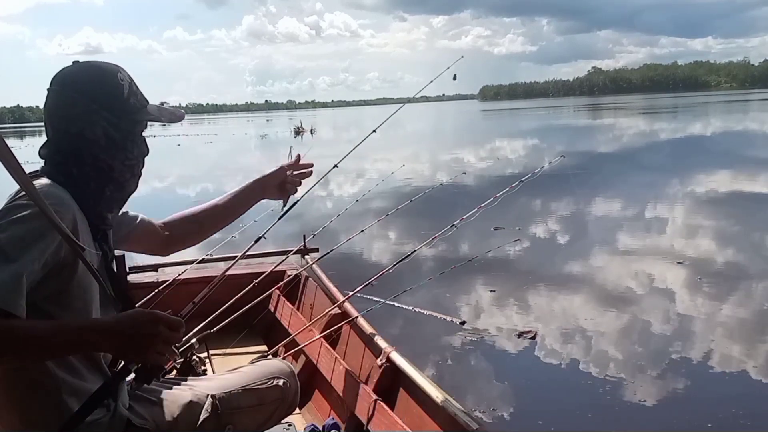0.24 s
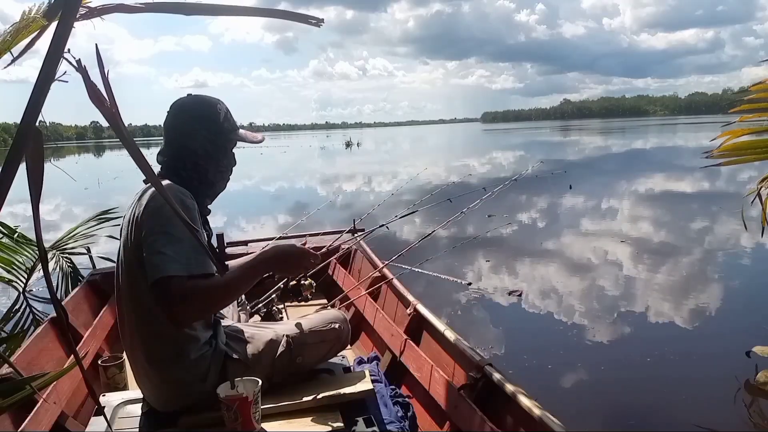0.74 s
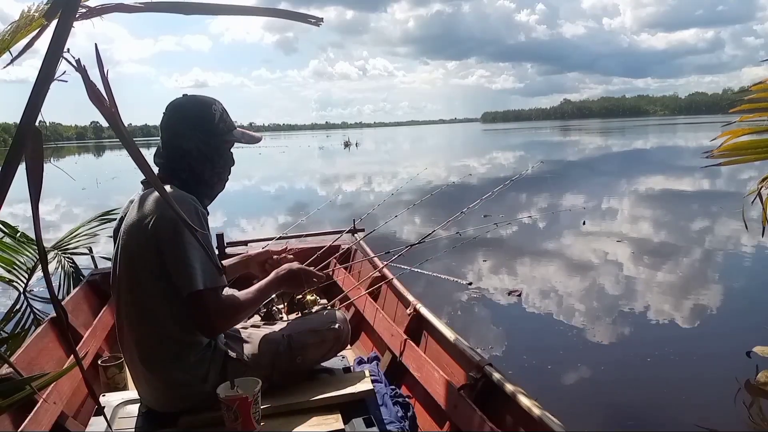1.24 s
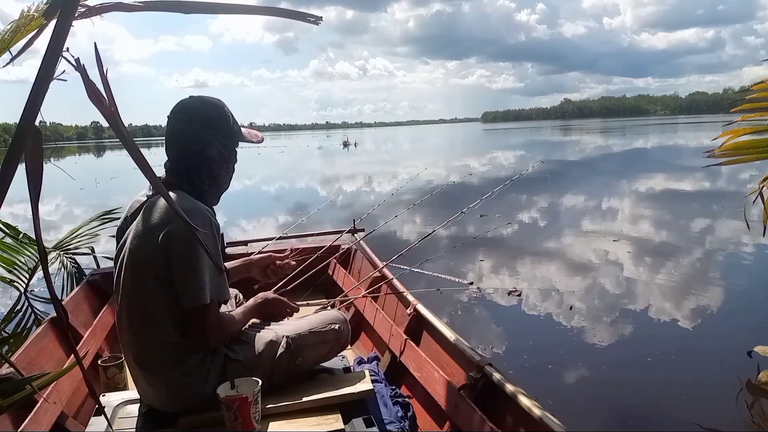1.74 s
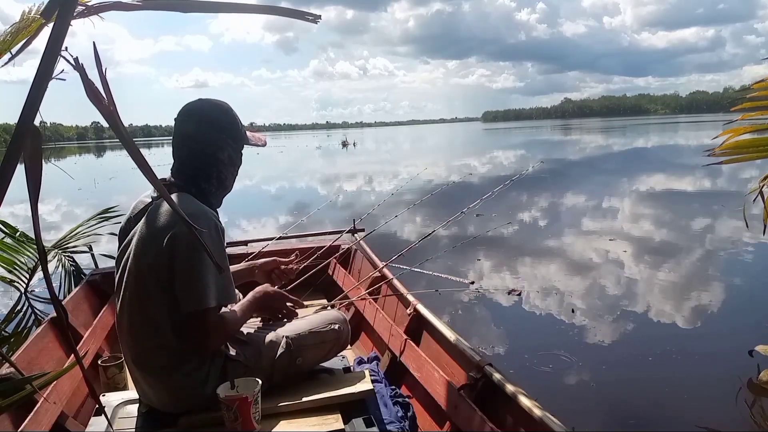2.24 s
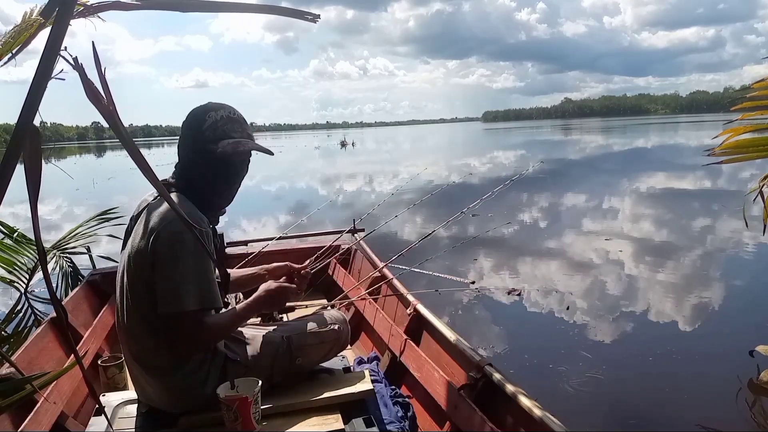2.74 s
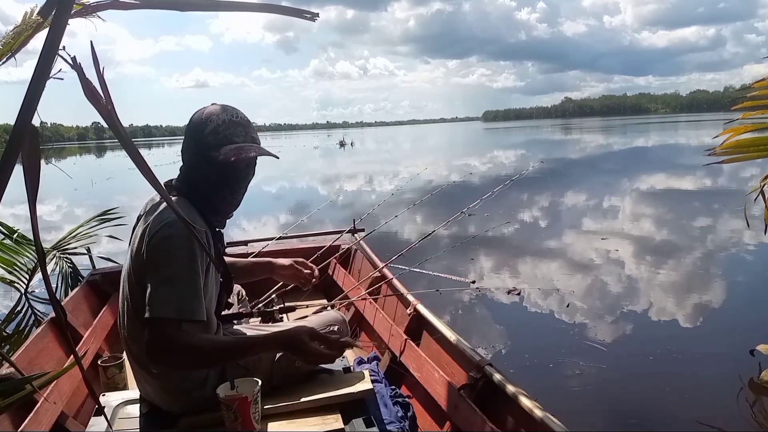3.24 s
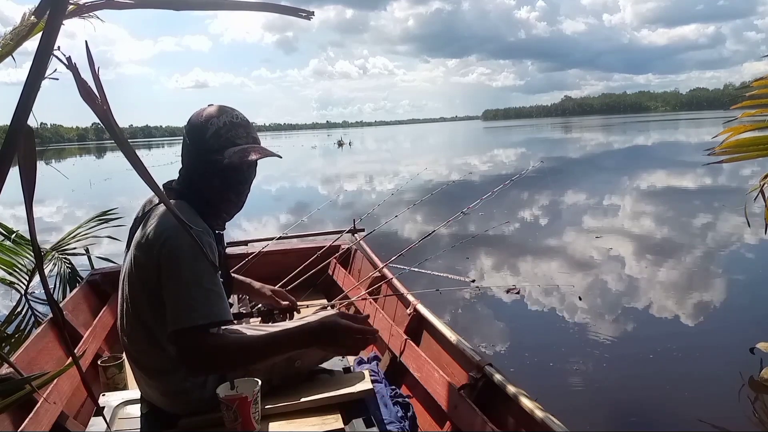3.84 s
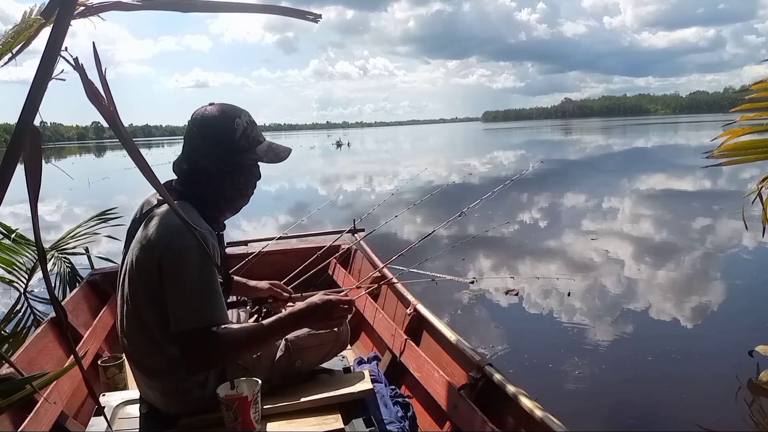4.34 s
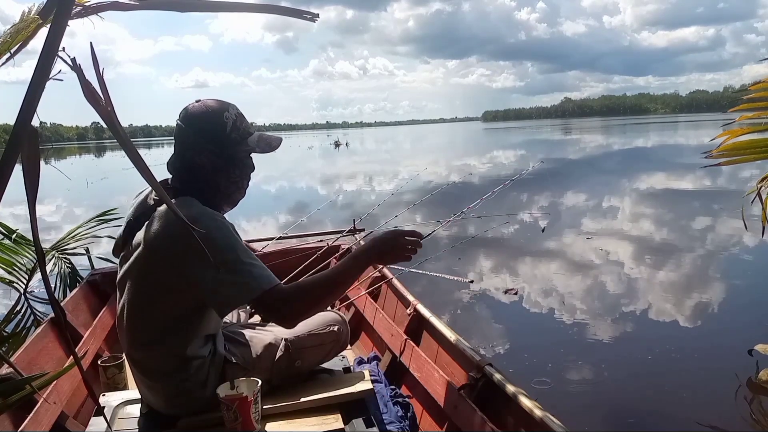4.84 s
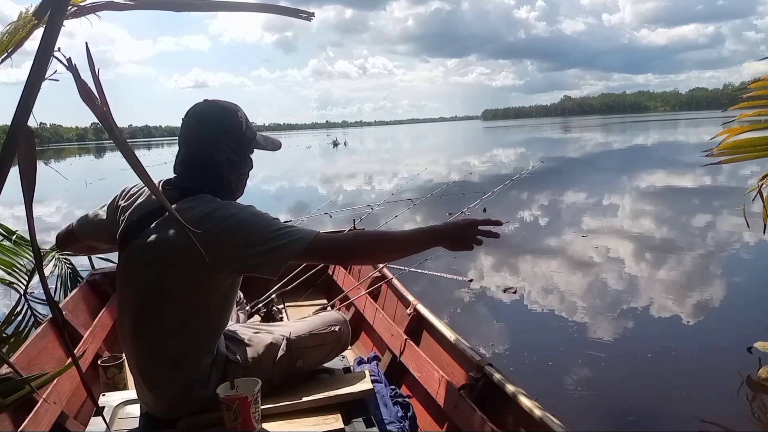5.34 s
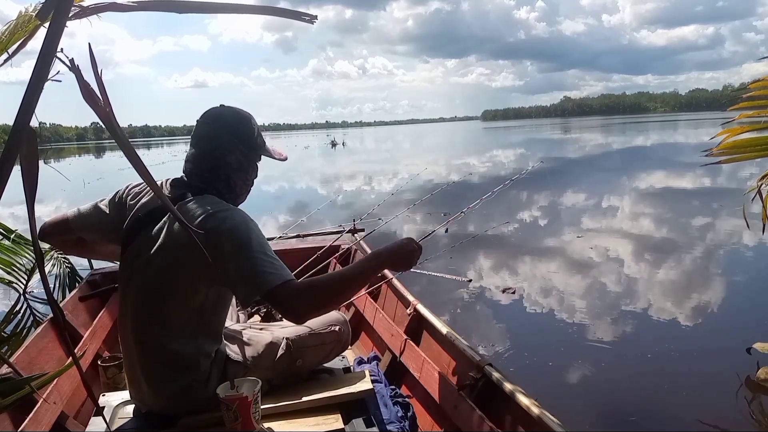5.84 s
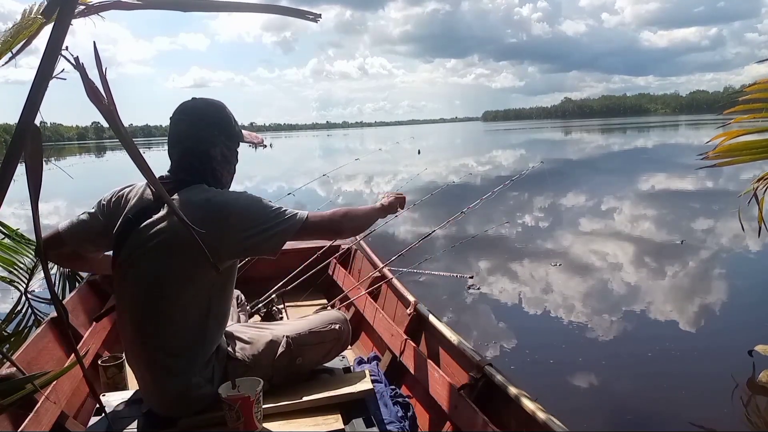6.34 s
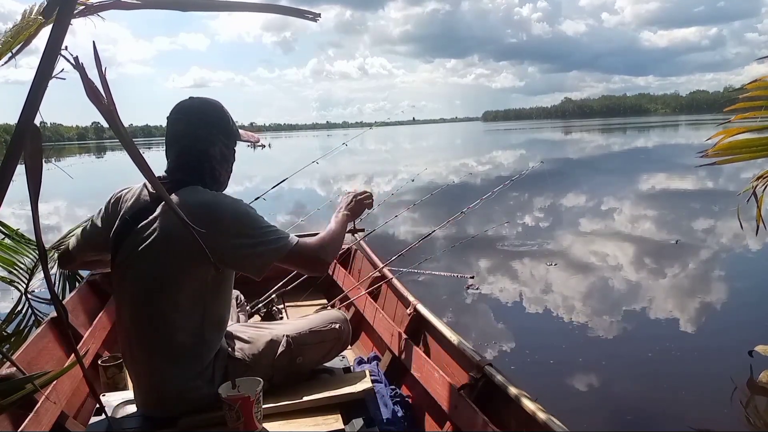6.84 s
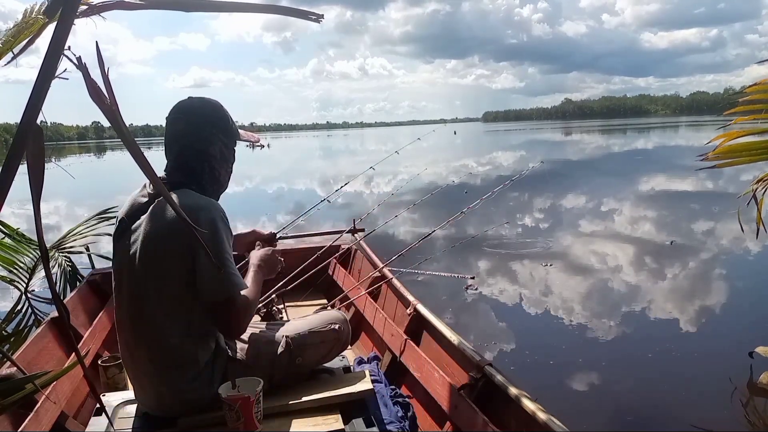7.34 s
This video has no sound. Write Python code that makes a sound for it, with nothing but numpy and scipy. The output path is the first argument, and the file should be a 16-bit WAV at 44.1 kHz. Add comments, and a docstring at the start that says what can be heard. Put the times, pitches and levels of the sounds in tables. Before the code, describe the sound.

A sharp water slap and hollow plop close by a wooden boat, drips after, while a distant one-cylinder engine putters and insects buzz.

```python
"""A calm, wide river, heard from a wooden boat where an angler sits. Close by, something slaps the water:
noise cracks and hisses, drops ping, gliding tones ring as bubbles, and a cavity shuts with a sharp plop
of pulse and noise; a few drips follow. Far off a one-cylinder boat engine thuds in short rings and puffs.
Insects buzz on the bank as narrow noise, tackle rustles faintly in grainy noise, the hull bumps softly
and the air hisses. The hull and canopy add weak reflections to the near sounds."""
import sys
import numpy as np
from scipy import signal
from scipy.fft import rfft, irfft, next_fast_len
from scipy.io import wavfile
from scipy.ndimage import uniform_filter1d, map_coordinates

SR = 44100
rng = np.random.default_rng(int(sys.argv[2]) if len(sys.argv) > 2 else 0)


def unload_wav(signal):
    """Save mono or channel-first audio to the path in sys.argv[1] as 16-bit WAV at rate SR, clipped to [-1, 1]."""
    wavfile.write(
        sys.argv[1],
        SR,
        np.round(np.clip(np.atleast_2d(signal).T, -1, 1) * 32767).astype(np.int16),
    )


N = 334008  # length of the scene [samples]


def amp(db):
    """Decibels to gain."""
    return 10 ** (np.asarray(db) / 20)


def unit(x):
    """Scale to rms 1."""
    return x / np.sqrt(np.mean(x ** 2) + 1e-20)


def clock(count=N):
    """Sample times in seconds."""
    return np.arange(count) / SR


def fade(t, t60):
    """Exponential decay from t = 0, down 60 dB after t60 seconds."""
    return np.exp(-np.log(1000) * np.maximum(t, 0) / t60)


def envelope(t, attack, hold, t60):
    """Rise from t = 0, stay until hold, then die away."""
    return np.clip(t / attack, 0, 1) * fade(t - hold, t60)


def along(points, hz):
    """Interpolate (Hz, value) points on a log frequency axis."""
    f, v = np.transpose(points)
    return np.interp(np.log(hz + 1), np.log(f + 1), v)


def curves(rows):
    """One value per sample for each column after the time."""
    s, *cols = np.transpose(rows)
    return [np.interp(clock(), s, c) for c in cols]


def wobble(rate):
    """A smooth random curve with rate knots a second."""
    knots = rng.standard_normal(int(N * rate / SR) + 4)
    return map_coordinates(knots, [clock() * rate])


def filtered(x, response):
    """x times a response of frequency."""
    m = next_fast_len(len(x) + SR // 4)
    return irfft(rfft(x, m) * response(np.fft.rfftfreq(m, 1 / SR)), m)[:len(x)]


def coloured(x, spectrum):
    """x with the given spectrum, at rms 1."""
    return unit(filtered(x, lambda hz: amp(along(spectrum, hz))))


def ringing(x, spectrum, size=2048):
    """x through a causal (minimum-phase) response of energy 1 with the given spectrum."""
    cepstrum = irfft(np.log(amp(along(spectrum, np.fft.rfftfreq(size, 1 / SR))) + 1e-6))
    response = irfft(np.exp(rfft(2 * cepstrum[:size // 2], size)))
    return signal.fftconvolve(x, response / np.linalg.norm(response))[:N]


def add(track, s, sound):
    """Mix a sound into a track at time s."""
    part = track[max(round(s * SR), 0):][:len(sound)]
    part += sound[:len(part)]


def patchy(depth_db):
    """Noise whose level drifts a little in small patches of pitch and time."""
    z = signal.stft(rng.standard_normal(N), nperseg=1024)[2]
    field = uniform_filter1d(rng.standard_normal(z.shape), size=3, axis=0)
    field = uniform_filter1d(field, size=8, axis=1)
    return signal.istft(z * amp(depth_db * unit(field)), nperseg=1024)[1][:N]


# Open air all around the microphone, relative spectrum: (frequency [Hz], level [dB])
AIR_SPECTRUM = [(100, 12), (500, 0), (700, -3.5), (1200, -6.5), (2200, -10.5), (5500, -15), (6700, -13),
                (8000, -22.5), (10000, -28.5), (14000, -30.5)]


def air(hiss_db=-67, rumble_db=-73.5):
    """Open-air hiss over a faint, uneven rumble of breeze."""
    low_end = [(30, -45.5), (45, -9.5)]
    hiss = amp(hiss_db) * coloured(patchy(depth_db=2.25), low_end + AIR_SPECTRUM)
    rumble = coloured(rng.standard_normal(N), [(30, -51), (65, -10.5), (150, 3), (1500, -45.5)])
    return hiss + amp(rumble_db + 3 * wobble(19)) * rumble


def firings(turns, spectrum, ring_hz, swell, rough, echo_db, cycle_db, scatter_db):
    """Each cycle sets off a short ring and a turbulent puff, over a wash of echoes off the banks."""
    t = clock(SR // 8)
    ring = (t / swell * np.exp(1 - t / swell)) ** 2 * np.sin(2 * np.pi * ring_hz * t)
    strokes = np.diff(np.floor(turns), prepend=np.floor(turns[0]))  # 1 where a cycle begins
    pulses = unit(signal.fftconvolve(strokes, ring)[:N])
    # the puff weakens through each cycle; the wash stays level
    puff_gain = amp(cycle_db * (turns % 1)) + amp(echo_db)
    puffs = coloured(rng.standard_normal(N) * puff_gain, spectrum)
    return unit((pulses + rough * puffs) * amp(scatter_db * wobble(14)))


# The engine far off over the water: (time [s], rate [firings per s])
ENGINE_SPEED = [(0, 15.76), (2.6, 15.25), (3.8, 15.55), (5.2, 15.21), (6.2, 15.89), (7.57, 14.83)]
# Its low thud, relative spectrum: (frequency [Hz], level [dB])
THUD_SPECTRUM = [(30, -36.5), (55, -13), (80, -4.5), (110, 5), (145, 5), (180, -14), (215, -5.5),
                 (290, -28), (400, -27.5), (660, -64)]
# The bark of its exhaust, relative spectrum: (frequency [Hz], level [dB])
BARK_SPECTRUM = [(150, -38), (220, -3.5), (290, -4), (350, -0.5), (420, 3.5), (480, -6.5), (560, -32.5),
                 (900, -47)]
THUD_DB, BARK_DB = -58, -67.5
THUD_FULL_S, THUD_RISE_DB_PER_S = 1.0, 9.5  # the thud swells, then holds


def engine(dull_s=6.25, dull_hz=350, dull_db=2.0):
    """Each firing barks from the exhaust and thuds; late on, the bark turns duller."""
    turns = np.cumsum(curves(ENGINE_SPEED)[0]) / SR + .39
    thud_db = THUD_DB - THUD_RISE_DB_PER_S * np.maximum(THUD_FULL_S - clock(), 0)
    thud = amp(thud_db) * firings(turns, THUD_SPECTRUM, ring_hz=124.0, swell=0.0069, rough=1.2,
                                  echo_db=-9.5, cycle_db=-21.5, scatter_db=1.63)
    bark = amp(BARK_DB) * firings(turns, BARK_SPECTRUM, ring_hz=416, swell=.006, rough=2.9,
                                  echo_db=-23, cycle_db=-23.5, scatter_db=1.75)
    dull_bark = amp(dull_db) * filtered(bark, lambda hz: 1 / (1 + (hz / dull_hz) ** 10))
    dull = np.clip((clock() - dull_s) * 10, 0, 1)
    return thud + (1 - dull) * bark + dull * dull_bark


def narrow(hz, width_hz):
    """Insect tone: a narrow band of noise at rms 1, its beats partly evened out."""
    def slow():
        return filtered(rng.standard_normal(N), lambda f: np.exp(-(f / width_hz) ** 2))
    beats = slow() + 1j * slow()
    even = beats / np.abs(beats) ** .4
    phase = 2 * np.pi * np.cumsum(hz * np.ones(N)) / SR
    return unit(np.real(even * np.exp(1j * phase)))


# Phrases of a distant insect on the bank: (start [s], length [s])
TRILL_PHRASES = [(0.104, 1.73), (2.003, 1.03), (3.394, 1.996)]
TRILL_DB, TRILL_ATTACK_S, TRILL_T60 = -76, 0.22, 1.2
TRILL_SWELL_DB, TRILL_FLUTTER_DB = 2.5, 3  # slow and quick unevenness
# Calls of a nearer insect: (start [s], swell [s], length [s], full level [dB])
BUZZ_CALLS = [(5.702, 0.55, .53, -57), (6.806, 0.14, .38, -58.5), (7.555, .13, .38, -58)]
BUZZ_SOFT_DB, BUZZ_ATTACK_S, BUZZ_T60 = -10, 0.018, 0.42  # a call starts this far under full level
BUZZ_HZ, BUZZ_SAG_HZ = 7300, 224  # pitch at full effort, and how much lower a call starts


def insects():
    """A thin far trill in long phrases, and a nearer buzz that grows louder and higher with effort."""
    t = clock()
    trill = sum(envelope(t - s, TRILL_ATTACK_S, length, TRILL_T60) for s, length in TRILL_PHRASES)
    trill_db = TRILL_DB + TRILL_SWELL_DB * wobble(11) + TRILL_FLUTTER_DB * wobble(70)
    far = amp(trill_db) * trill * narrow(hz=6355, width_hz=150)
    buzz, slack = np.zeros(N), np.ones(N)  # slack: 1 at the start of a call, 0 at full effort
    for s, swell, length, db in BUZZ_CALLS:
        slack = np.where(t < s, slack, np.clip(1 - (t - s) / swell, 0, 1))
        buzz += amp(db + BUZZ_SOFT_DB * slack) * envelope(t - s, BUZZ_ATTACK_S, length, BUZZ_T60)
    return far + buzz * narrow(BUZZ_HZ - BUZZ_SAG_HZ * slack, width_hz=89)


# Soft bumps of the hull underfoot: (time [s], level [dB])
HULL_BUMPS = [(0.602, -47), (1.068, -46.5), (2.474, -42.5), (3.03, -53), (6.296, -42.5), (6.746, -45)]
BUMP_HZ = 70


def hull(swell=0.012):
    """The boat shifts with dull bumps, low tones a few cycles long."""
    out, t = np.zeros(N), clock(SR // 4)
    bump = (t / swell * np.exp(1 - t / swell)) ** 2 * np.sin(2 * np.pi * BUMP_HZ * t)
    for s, db in HULL_BUMPS:
        add(out, s, amp(db) * bump)
    return out


# Tackle and clothes in the boat: (time [s], length [s], level [dB], centre [Hz])
TACKLE_RUBS = [(0.586, 0.054, -75.5, 4030), (0.73, 0.026, -62.5, 4400), (0.807, .025, -74, 5450),
               (0.904, 0.022, -69, 3500), (1.365, 0.083, -73.5, 8400), (1.908, 0.016, -59.5, 2900),
               (2.105, .01, -70.5, 2450), (2.269, 0.021, -67, 5150), (5.883, .03, -69, 2250),
               (7.112, 0.018, -76, 2100)]
RUSTLE_T60 = .14


def tackle(octaves=0.84, attack=0.0054, grain_db=4, body_db=-6, body_hz=900, ring=1.0, ring_t60=0.048):
    """Short rubs of line and cloth, grainy and uneven, each trailing a brief ragged ring."""
    out, t = np.zeros(N), clock(SR // 2)

    def band(hz, centre):
        return np.exp(-(np.log2((hz + 1) / centre) / octaves) ** 2 / 2)

    for s, length, db, centre_hz in TACKLE_RUBS:
        def colour(hz):
            bands = band(hz, centre_hz) + amp(body_db) * band(hz, body_hz)
            return bands / (1 + (hz / 9500) ** 8)
        grains = rng.standard_normal(len(t)) * amp(grain_db * wobble(283)[:len(t)])
        resonance = rng.standard_normal(len(t)) * fade(t, ring_t60)
        rung = unit(irfft(rfft(grains) * rfft(resonance), len(t)))
        rub = unit(filtered(unit(grains) + ring * rung, colour))
        add(out, s, amp(db) * rub * envelope(t, attack, length, RUSTLE_T60))
    return out


# Reverberation between hull and canopy, around the microphone: (frequency [Hz], t60 [s])
BOAT_T60 = [(200, 0.063), (2000, 0.23), (6500, 0.29), (12000, 0.13)]


def boat(x, early_t60=0.046, early_db=-13, late_db=-15):
    """The planks throw back quick, weak reflections; hull and canopy scatter a faint tail."""
    t = clock(SR // 3)
    early = rng.standard_normal(len(t)) * fade(t, early_t60) * (t > .001)
    hz, frames, z = signal.stft(rng.standard_normal(len(t)), SR, nperseg=256)
    decay = fade(frames, along(BOAT_T60, hz)[:, None])
    late = signal.istft(z * decay, SR, nperseg=256)[1][:len(t)]
    response = amp(early_db) * early / np.linalg.norm(early) + amp(late_db) * late / np.linalg.norm(late)
    return signal.fftconvolve(x, response)[:N]


def bubble(hz, t60, rise, attack=0.0004, count=4096):
    """A pocket of air rings and glides in pitch by rise octaves, upward as it nears the surface."""
    t = clock(count)
    pitch = np.minimum(hz * 2 ** (rise * np.minimum(t / t60, 1)), SR / 2)
    tone = np.sin(2 * np.pi * np.cumsum(pitch, axis=-1) / SR)
    return tone * fade(t, t60) * (1 - np.exp(-t / attack))


def life(hz):
    """Ring time (t60) of a bubble in seconds: small, high ones die sooner."""
    at_1khz_s = 0.035
    return at_1khz_s * (hz / 1000) ** -.6


# Swarms of small bubbles close by, under the shower, behind the plop and as the water settles:
# (start [s], length [s], centre [Hz], level [dB], count [bubbles])
BUBBLE_SWARMS = [(4.04, .40, 2700, -48, 150), (4.555, .085, 850, -55, 16), (4.93, .22, 4200, -58, 24)]


def swarms(spread=.5, size_db=4, rise=.3, ring=1.2):
    """Bubbles of mixed sizes that crowd in soon after each start and then thin out."""
    out = np.zeros(N)
    for start, length, centre_hz, db, count in BUBBLE_SWARMS:
        for when, chance in zip(rng.triangular(0, 1 / 3, 1, count), rng.standard_normal((count, 3))):
            pitch, size, glide = np.clip(chance, -2, 2)
            hz = centre_hz * np.exp(spread * pitch)
            sound = bubble(hz, ring * life(hz), rise * (1 + glide))
            add(out, start + length * when, amp(db + size_db * size) * sound)
    return out


def patter(count, per_s=1700, centre_hz=4500, spread=.65, cycles=38, size_db=11.0, rise=0.063):
    """Tiny drops, each a short ping that glides a little."""
    out, length = np.zeros(count), count / SR
    pitch, size, glide = rng.standard_normal((int(per_s * length), 3)).T[:, :, None]
    hz = np.minimum(centre_hz * np.exp(spread * pitch), SR / 3)
    pings = bubble(hz, cycles / hz, rise * (1 + 2 * glide), attack=0.000212, count=768)
    drops = amp(size_db * np.minimum(size, 2)) * pings
    for when, drop in zip(rng.random(len(drops)) * length, drops):
        add(out, when, drop)
    return unit(out)


# Slaps on the surface close by, first the strike, then lumps of water falling back:
# (time [s], level [dB])
WATER_SLAPS = [(3.9000, -19.5), (3.9153, -25.5), (3.9338, -34), (3.9410, -28.5), (4.0530, -37.5),
               (4.0892, -43), (4.111, -42.5), (4.1559, -31.5), (4.1802, -28), (4.342, -37), (4.3919, -39),
               (4.468, -43.5), (5.0632, -45.5), (5.112, -50.5)]
# Broken water near the microphone, relative spectrum: (frequency [Hz], level [dB])
SPLASH_SPECTRUM = [(100, -17), (170, -1), (290, -7.5), (650, -13), (1100, -9.5), (2200, -0.5), (2900, -5),
                   (3700, -2), (7200, 1), (9200, -6.5), (12000, -18), (15000, -22)]
# Tone of the pinging drops: (frequency [Hz], gain [dB])
DROP_TONE = [(300, -5.5), (1000, -15), (3000, -5.5), (6000, 3), (8800, 10), (11000, -7), (15000, -9.5)]
SHEET_S, SHEET_HOLD_S, SHEET_DB, SHEET_T60 = 3.897, 0.039, -32, 0.065  # water thrown up by the strike
# the sheet raining back
SHOWER_S, SHOWER_RISE_S, SHOWER_HOLD_S, SHOWER_DB, SHOWER_T60 = 3.93, .28, .16, -49.5, 0.344
DRIBBLE_DB, DRIBBLE_HOLD_S, DRIBBLE_T60 = -70.5, 1.15, 0.43  # fine drops that outlast the shower
SPATTER_DB, SPATTER_HOLD_S, SPATTER_T60 = -10, 0.019, 0.14  # drops from a lump, level relative to it


def spray(tear=0.85, mist=0.56, clump_db=4.5, burst_db=3.2, attack=.003):
    """The sheet tears off with a hiss and rains back in clumps of drops; each falling lump spatters more."""
    t = clock()
    sheet = amp(SHEET_DB) * envelope(t - SHEET_S, attack, SHEET_HOLD_S, SHEET_T60)
    shower_end = SHOWER_RISE_S + SHOWER_HOLD_S
    shower = amp(SHOWER_DB) * envelope(t - SHOWER_S, SHOWER_RISE_S, shower_end, SHOWER_T60)
    dribble = amp(DRIBBLE_DB) * envelope(t - SHOWER_S, attack, DRIBBLE_HOLD_S, DRIBBLE_T60)
    power = (shower * unit(amp(burst_db * wobble(62)))) ** 2 + dribble ** 2
    spatter = envelope(clock(SR // 3), attack, SPATTER_HOLD_S, SPATTER_T60)
    for s, db in WATER_SLAPS[1:]:
        add(power, s, (amp(db + SPATTER_DB) * spatter) ** 2)
    falling = np.sqrt(power) * unit(amp(clump_db * wobble(160)))
    # tear and mist: the hissing share of sheet and falling water; the rest pings as drops
    hiss = np.hypot(tear * sheet, mist * falling) * rng.standard_normal(N)
    pings = np.zeros(N)
    add(pings, SHEET_S, patter(count=2 * SR))
    drops = np.sqrt((1 - tear ** 2) * sheet ** 2 + (1 - mist ** 2) * falling ** 2) * pings
    return ringing(hiss, SPLASH_SPECTRUM) + filtered(drops, lambda hz: amp(along(DROP_TONE, hz)))


# The loudest bubbles and drips close by: (time [s], pitch [Hz], level [dB])
LOUD_BUBBLES = [(3.899, 678, -31), (3.899, 2280, -26), (3.933, 7560, -22), (3.9405, 3550, -23),
                (4.053, 4800, -29.5), (4.0967, 1950, -28.5), (4.115, 1360, -36.5), (4.143, 6300, -32.5),
                (4.1566, 2900, -20.5), (4.183, 3200, -27.5), (4.2066, 1030, -35.5), (4.222, 6300, -30),
                (4.246, 3370, -32), (4.377, 2940, -29.5), (4.423, 3750, -38), (4.489, 1490, -41),
                (4.574, 2490, -35.5), (4.586, 800, -44), (4.597, 415, -38.5), (4.698, 5180, -32),
                (4.732, 4920, -41.5), (4.763, 2025, -36), (4.957, 7646, -44), (5.008, 5700, -46.5),
                (5.064, 3150, -35), (5.069, 3750, -32), (5.115, 7300, -37), (5.1354, 8350, -36)]
BUBBLE_RISE = 0.25  # typical glide over the ring [octaves]
TICK_DB, TICK_T60 = -21, 0.015  # the contact that traps a bubble, level relative to it
SATELLITE_DB, SATELLITE_LAG_S, SATELLITE_OCTAVES = -13.5, .014, .3  # level relative, longest lag, spread


def bubbles(count=3):
    """Each large bubble starts with a tick, rings once and sheds a few lesser ones."""
    out, t = np.zeros(N), clock(SR // 20)
    for s, hz, db in LOUD_BUBBLES:
        tick = coloured(rng.standard_normal(len(t)), SPLASH_SPECTRUM)
        add(out, s, amp(db + TICK_DB) * tick * fade(t, TICK_T60))
        rise = BUBBLE_RISE * (1 + .5 * rng.standard_normal())
        add(out, s, amp(db) * bubble(hz, life(hz), rise))
        for lag, pitch in zip(rng.random(count), np.clip(rng.standard_normal(count), -1, 2)):
            small_hz = min(hz * 2 ** (SATELLITE_OCTAVES * pitch), SR / 4)
            small = bubble(small_hz, life(small_hz), BUBBLE_RISE)
            add(out, s + SATELLITE_LAG_S * lag, amp(db + SATELLITE_DB) * small)
    return out


SLAP_T60 = .017


def slaps():
    """Each slap is a crack of noise that dies in milliseconds."""
    out, t = np.zeros(N), clock(SR // 8)
    for s, db in WATER_SLAPS:
        add(out, s, amp(db) * fade(t, SLAP_T60) * rng.standard_normal(len(t)))
    return ringing(out, SPLASH_SPECTRUM)


# The closing cavity, close by, relative spectrum: (frequency [Hz], level [dB])
PLOP_SPECTRUM = [(240, -32), (430, -27), (620, -13), (900, -4), (1350, -2), (1720, 6.5), (2250, -9),
                 (2850, -24), (3300, -10), (4130, -12), (5270, -1.5), (6900, 0), (9000, -15),
                 (11200, -42.5), (15000, -49)]
PLOP_S = 4.5492  # the moment the cavity shuts


def plop(pulse_db=-6, crack_db=-16.2, crack_t60=0.016, tail_db=-37, tail_t60=0.119):
    """The cavity shuts with one pressure pulse and a hard, hollow crack, and the water fizzes after it."""
    out, t = np.zeros(N), clock(SR // 4)
    add(out, PLOP_S, amp(pulse_db) * (t == 0))
    level = amp(crack_db) * fade(t, crack_t60) + amp(tail_db) * fade(t, tail_t60)
    add(out, PLOP_S, level * rng.standard_normal(len(t)))
    return ringing(out, PLOP_SPECTRUM)


def scene():
    """The splash and tackle close by, in front of the hull and the river's distant sounds."""
    background = air() + engine() + insects() + hull()
    near = tackle() + swarms() + spray() + bubbles() + slaps() + plop()
    return (background + near + boat(near))[None]


TOP_HZ = 15760  # band limit


def record(dry, port_hz=15300, port_width_hz=900, port_db=10):
    """The microphone port rings near the top of the range; nothing passes above the band limit."""
    def port(hz):
        return 1 + amp(port_db) * np.exp(-((hz - port_hz) / port_width_hz) ** 2)
    return filtered(dry[0], lambda hz: port(hz) * (hz < TOP_HZ))[None]


dry = scene()
out = record(dry)
unload_wav(out)
```